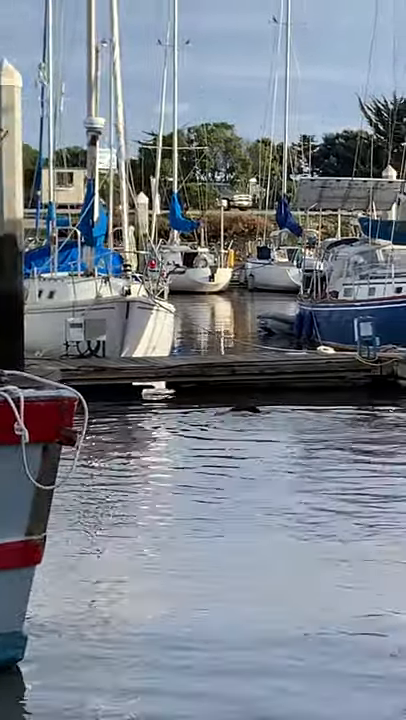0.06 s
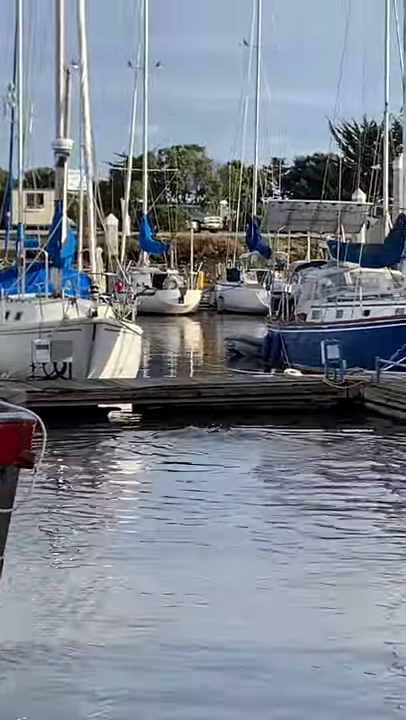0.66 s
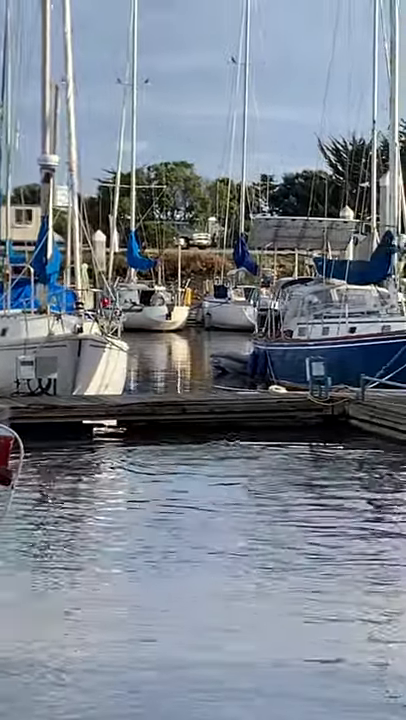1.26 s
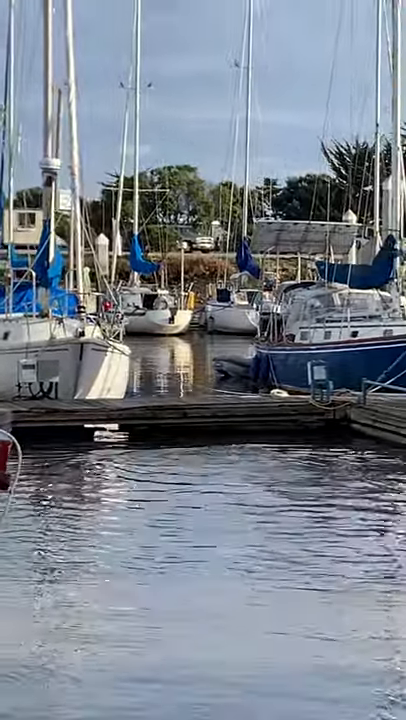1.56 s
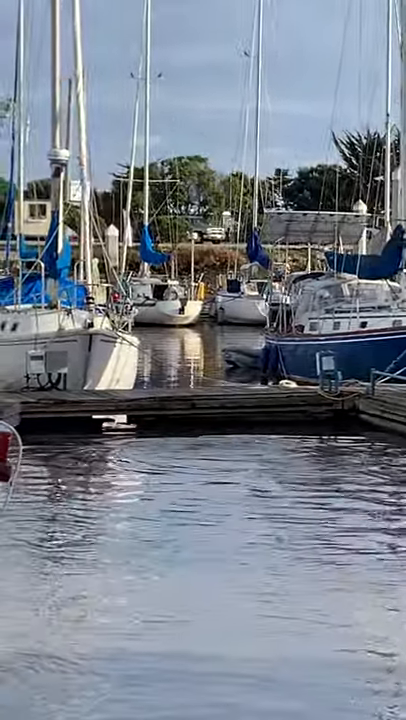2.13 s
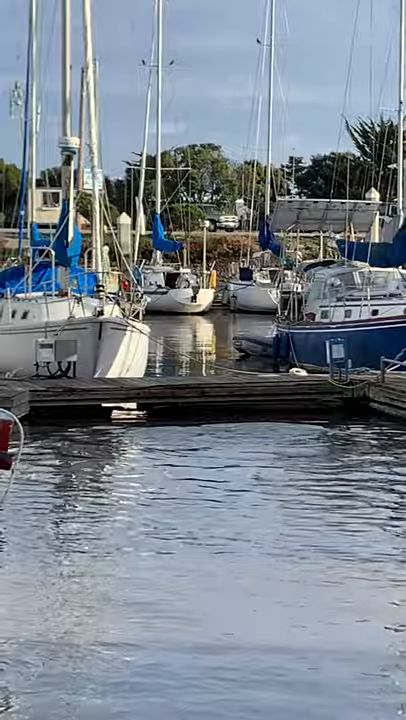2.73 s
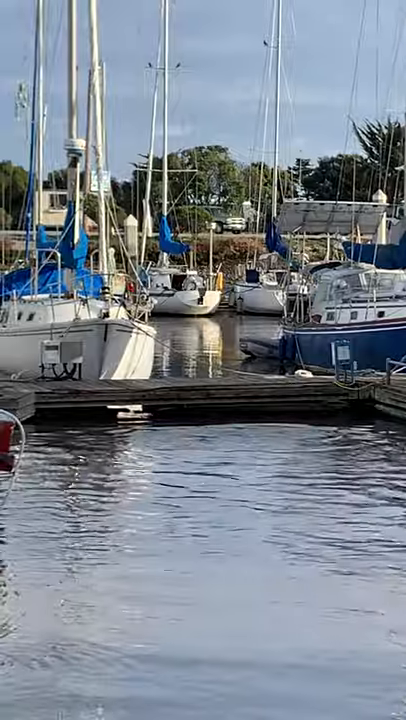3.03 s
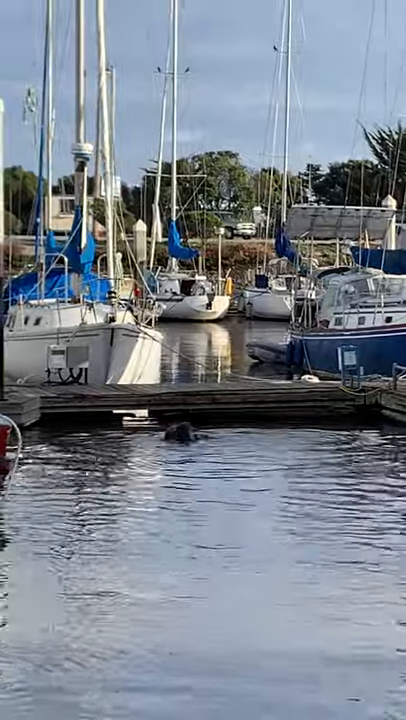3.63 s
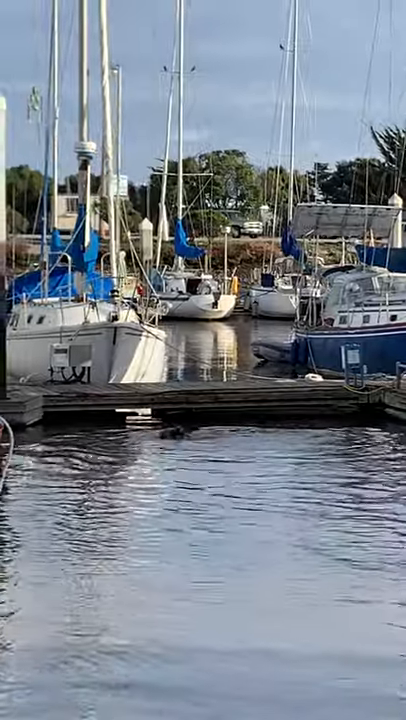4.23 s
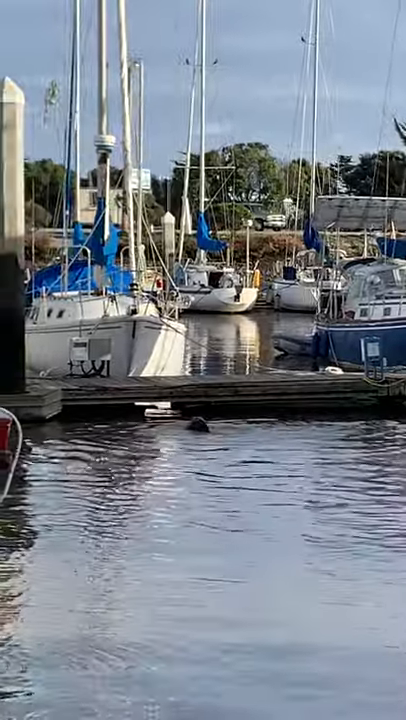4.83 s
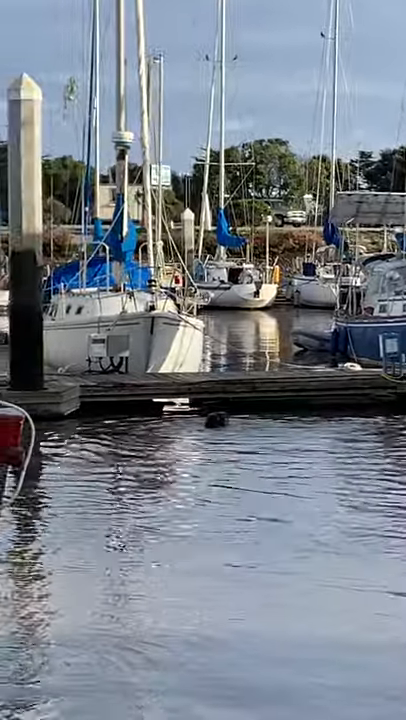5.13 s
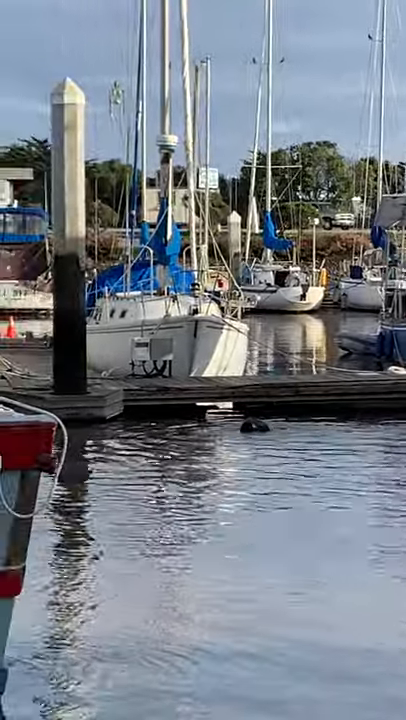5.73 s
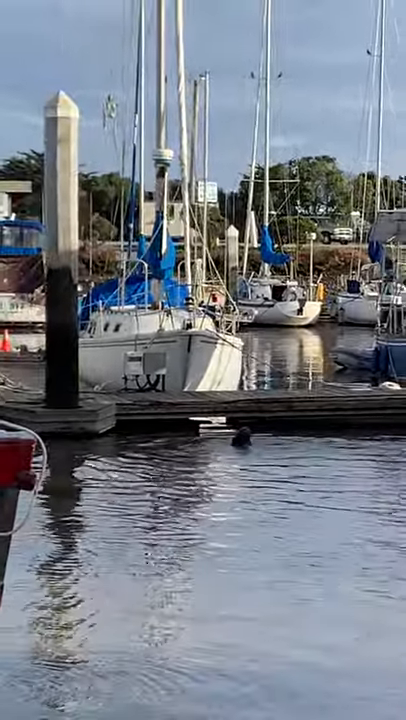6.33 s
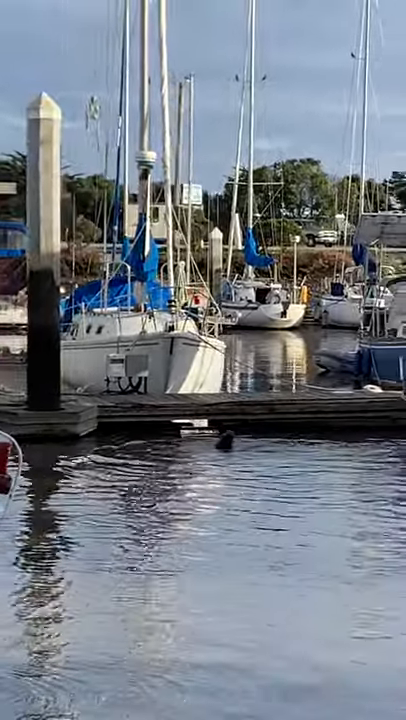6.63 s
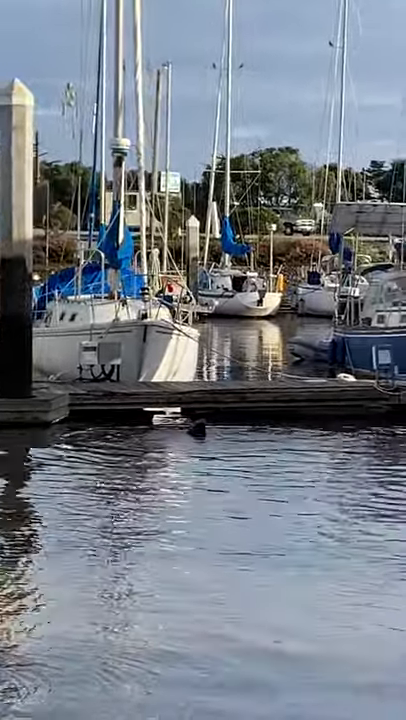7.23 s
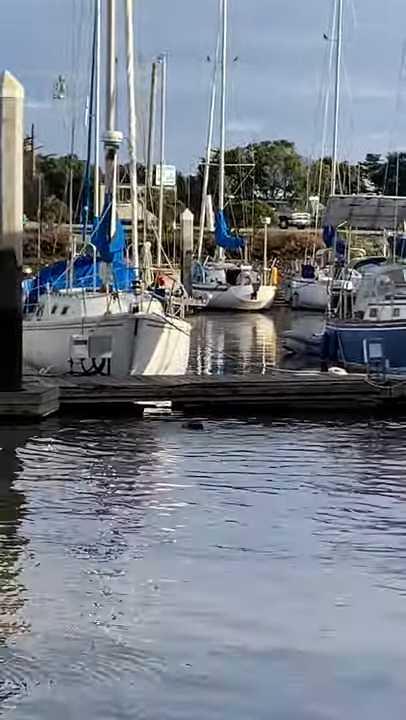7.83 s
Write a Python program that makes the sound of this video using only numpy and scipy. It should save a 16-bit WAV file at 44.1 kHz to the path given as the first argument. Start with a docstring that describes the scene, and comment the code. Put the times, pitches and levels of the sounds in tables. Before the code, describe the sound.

Diesel engines throb and rumble across a calm harbor, revving up once midway and falling back over a steady generator drone.

```python
"""Diesel exhausts throb far across a calm harbour, four firing notes beating against each other.
Midway twin engines rev up and fall back, lifting the rumble and adding growl and combustion knock.
A governed generator drones and clatters on. The scene opens with a buzzing rush; behind it all lie
hums, whirrs, faint whistles and a steady distant wash, heard through two close microphone ports."""
import sys
import numpy as np
from scipy import signal
from scipy.fft import irfft, next_fast_len
from scipy.io import wavfile
from scipy.ndimage import uniform_filter1d

SR = 44100
rng = np.random.default_rng(int(sys.argv[2]) if len(sys.argv) > 2 else 0)


def to_wav(s):
    """Save 16-bit WAV."""
    ch = np.atleast_2d(s).T  # columns
    pcm = np.round(np.clip(ch, -1, 1) * 32767)  # PCM
    wavfile.write(sys.argv[1], SR, pcm.astype(np.int16))


N = 355887
T = np.arange(N) / SR
SHAFT_HZ = 30.45  # generator turns per second


def from_db(db):
    """Decibels to gain."""
    return 10 ** (np.asarray(db) / 20)


def unit(x):
    """Scales to an rms of one."""
    return x / np.sqrt(np.mean(abs(x) ** 2) + 1e-20)


def ease(start_s, takes_s):
    """A smooth ramp from 0 to 1, as of a heavy flywheel."""
    return 1 - np.exp(-(np.maximum(T - start_s, 0) / takes_s) ** 2)


def bump(middle_s, half_s):
    """A bell-shaped envelope that peaks at 1."""
    return np.exp(-((T - middle_s) / half_s) ** 2)


def drift(rate_hz):
    """A smooth complex random modulator of unit size, changing about rate_hz times a second."""
    control_rate = 256
    hz = np.fft.fftfreq(4096, 1 / control_rate)
    a, b = rng.standard_normal((2, len(hz)))
    slow = unit(np.fft.ifft((a + 1j * b) * np.exp(-(hz / rate_hz) ** 2)))
    return np.interp(T * control_rate, np.arange(len(hz)), slow)


def colour(spectrum, hz):
    """Gain of an EQ curve at these frequencies."""
    f, db = np.transpose(spectrum)
    return from_db(np.interp(np.log(hz + 1), np.log(f), db))


# Stereo image at the two ports: f/Hz, coherence/0-1, left lead/rad, left minus right/dB
STEREO_IMAGE = [(60, 1, 0, .7), (180, .99, 0, .9), (350, .92, -.1, .8), (600, .66, -.2, 1),
                (950, .48, .4, 1.4), (1600, .6, 1.2, 1.8), (2500, .4, 1.6, .7), (3500, .7, 1.6, .8),
                (4850, .93, 3.14, .2), (6800, .92, 6.2, 0), (9000, .92, 9.4, 0), (15200, .88, 18.8, 0)]


def ports(hz):
    """Coherence, phase lead and balance of the two ports at these frequencies."""
    f, *columns = np.transpose(STEREO_IMAGE)
    return [np.interp(hz, f, column) for column in columns]


def place(tone, hz):
    """A complex tone as it reaches the two ports, a unit tone giving an rms near one."""
    _, lead, tilt_db = ports(hz)
    left = tone.real * from_db(tilt_db / 2)
    right = (tone * np.exp(-1j * lead)).real * from_db(-tilt_db / 2)
    return np.sqrt(2) * np.array([left, right])


def port_pair(hz, count):
    """Partly coherent random spectra, left and right, shaped (2, frequencies, count)."""
    a, b, c, d = rng.standard_normal((count, len(hz), 4)).T
    coherence, lead, tilt_db = ports(hz[:, None])
    left = a + 1j * b
    right = (coherence * left + np.sqrt(1 - coherence ** 2) * (c + 1j * d)) * np.exp(-1j * lead)
    return np.array([left * from_db(tilt_db / 2), right * from_db(-tilt_db / 2)])


def far_noise(spectrum, patchy_db=2):
    """Coloured stereo noise of unit rms; moving air fades narrow patches of it in and out."""
    hz, frames = np.fft.rfftfreq(4096, 1 / SR), N // 1024 + 5
    patches = rng.standard_normal((frames, len(hz))).T
    patches = unit(uniform_filter1d(uniform_filter1d(patches, size=5, axis=0), size=7, axis=1))
    spectra = port_pair(hz, frames) * colour(spectrum, hz)[:, None] * from_db(patchy_db * patches)
    return unit(signal.istft(spectra, nperseg=4096, noverlap=3072)[1][:, :N])


def resonance(hz, width_hz):
    """A narrow band of noise that follows the pitch curve hz."""
    offset = np.fft.fftfreq(next_fast_len(N), 1 / SR)
    a, b = rng.standard_normal((2, len(offset)))
    blur = unit(np.fft.ifft((a + 1j * b) * np.exp(-(offset / width_hz) ** 2))[:N])
    return place(blur * np.exp(2j * np.pi * np.cumsum(hz) / SR), np.median(hz))


def buzz(hz, spectrum, stop=22, fade_hz=10):
    """The overtones of a hard-working exhaust, each fading on its own."""
    angle = 2 * np.pi * np.cumsum(hz) / SR
    out = np.zeros((2, N))
    for k in range(2, stop):
        top_hz = k * hz.max()
        out += place(colour(spectrum, top_hz) * drift(fade_hz) * np.exp(1j * k * angle), top_hz)
    return unit(out)


# EQ of the harbour bed: f/Hz, relative level/dB
WASH_EQ = [(20, -43), (34, -32), (45, -2.5), (70, -7), (160, -2), (215, -5), (300, -8), (340, -9.5),
           (420, -12), (860, -16.5), (1050, -19.5), (1700, -15.5), (1900, -20.5), (2200, -24.5),
           (4000, -31.5), (7500, -45), (9000, -49), (12000, -50.5), (16000, -55.5)]


def wash(level_db=-27):
    """The even roar of far machinery and roads."""
    return from_db(level_db) * far_noise(WASH_EQ)


# Airy falling whistles: middle t/s, half length/s, middle f/Hz, level/dB
AIR_WHISTLES = [(.5, .22, 7800, -62), (3.2, 0.54, 6700, -64)]


def whistles(width_hz=750, fall_per_s=0.17):
    """Faint airy whistles sink in pitch, like turbochargers running down."""
    out = np.zeros((2, N))
    for middle_s, half_s, hz, db in AIR_WHISTLES:
        pitch = hz * np.exp(-fall_per_s * np.clip(T - middle_s, -2 * half_s, 2 * half_s))
        out += from_db(db) * bump(middle_s, half_s) * resonance(pitch, width_hz)
    return out


def gear_whine(hz=1944, level_db=-49, width_hz=8):
    """A thin, wavering whine of gears."""
    return place(from_db(level_db) * drift(width_hz) * np.exp(2j * np.pi * hz * T), hz)


# Whirring housings: f/Hz, width/Hz, level/dB
HOUSING_BANDS = [(847, 22, -49), (1554, 62, -50), (1705, 77, -47)]


def whirrs(waver=0.028, waver_hz=1.6, flicker_db=2):
    """Machine housings whirr, wavering in pitch and level."""
    out = np.zeros((2, N))
    for hz, width_hz, db in HOUSING_BANDS:
        gain = from_db(db + flicker_db * drift(waver_hz).real)
        pitch = hz * (1 + waver * drift(waver_hz).real)
        out += gain * resonance(pitch, width_hz)
    return out


# Ringing accents: middle t/s, half length/s, middle f/Hz, glide/(Hz/s), width/Hz, level/dB
RING_CUES = [(0.146, 0.17, 382.6, -9, 30, -32.5), (.17, 0.07, 520, 3, 54, -31.5),
             (0.127, 0.13, 1390, 2, 60, -34.5), (.68, 0.1, 152.7, -15, 2, -27),
             (.8, 0.12, 1570, 3, 14, -41), (1.952, 0.12, 1487, -59, 15, -39.5),
             (2.83, 0.12, 179.8, -21, 5.2, -28), (3.393, .35, 1690, 112.5, 16, -51),
             (3.45, .25, 718, 0.5, 20, -47), (3.6, .35, 1357, 0.5, 19, -44.5),
             (3.75, 0.23, 1143, 1, 13, -44), (4.45, 0.16, 1740, -0.5, 28, -43),
             (4.704, .3, 1338, -54, 24, -43.5), (4.9, 0.19, 1625, 1, 30, -44)]


def rings():
    """Now and then a low boom or narrow ringing tone swells and fades."""
    out = np.zeros((2, N))
    for middle_s, half_s, hz, glide, width_hz, db in RING_CUES:
        pitch = hz + glide * np.clip(T - middle_s, -half_s, half_s)
        out += from_db(db) * bump(middle_s, half_s) * resonance(pitch, width_hz)
    return out


# Unsteady hums: f/Hz, width/Hz, level at full load/dB, share of the load swing/0-1
LOW_HUMS = [(43, 0.68, -43, 0.3), (64, 1.4, -34, 0.6), (84.3, 0.83, -42.5, 0), (93.2, 2.3, -38.5, 0.3),
            (107.9, 3.4, -35.5, 0.66), (142.6, 1.5, -37, 0.03), (182, 0.83, -41, 0.03),
            (252.8, 4.9, -40, 0.24), (312.4, 5.3, -42, 0.65)]


def hums():
    """Low wavering hums around the exhaust notes and their overtones; most swell with the load."""
    swing_db = load_db()
    swing_db -= swing_db.max()
    return sum(place(from_db(db + share * swing_db) * drift(width) * np.exp(2j * np.pi * hz * T), hz)
               for hz, width, db, share in LOW_HUMS)


# EQ of the opening rush: f/Hz, relative level/dB
RUSH_EQ = [(40, -25), (90, 12), (150, 6), (280, 2.5), (480, -1), (600, -8), (740, -5), (1150, -7.5),
           (1450, -6), (2300, -14), (4000, -23), (7000, -32), (10000, -43), (16000, -39)]


def rush(burst_db=-32, tail_db=-22.5, tail_t60_s=3.5):
    """The upper engine starts under strain: a broad, buzzing rush swells and dies away."""
    roar = from_db(-3) * far_noise(RUSH_EQ)
    rasp = from_db(-5.5) * buzz(upper_engine()[0], RUSH_EQ)
    burst = from_db(burst_db) * bump(middle_s=0.17, half_s=0.14)
    tail = from_db(tail_db - 60 * T / tail_t60_s)
    return (burst + tail) * (roar + rasp)


# EQ of the trailing hiss: f/Hz, relative level/dB
HISS_EQ = [(1500, -19), (3500, -19), (6000, 2), (7500, -6), (10000, 1), (12000, -17), (16000, -19)]


def hiss(start_db=-51, t60_s=6):
    """A thin hiss fades more slowly than the rush."""
    return from_db(start_db - 60 * T / t60_s) * far_noise(HISS_EQ)


def shaft(wander=0.001646):
    """Turns made by the generator shaft, its speed held nearly even by a governor."""
    return np.cumsum(SHAFT_HZ * (1 + wander * drift(1.65).real)) / SR


# EQ of the generator's rattle: f/Hz, relative level/dB
CLATTER_EQ = [(200, -19), (300, 1.5), (500, -8.5), (850, -6), (1100, -5.5), (1700, -9), (2000, -5),
              (2700, -21), (4000, -23), (7000, -27.5)]


def clatter(turns, level_db=-38, fade_hz=6, fading=1.02):
    """Valves and injectors repeat one rattle every two turns, heard directly and by a fading echo."""
    hz = np.arange(4097) * SHAFT_HZ / 2
    gain = colour(CLATTER_EQ, hz) * (hz > CLATTER_EQ[0][0]) * (hz < CLATTER_EQ[-1][0])
    cycles = irfft(port_pair(hz, count=2) * gain[:, None], axis=1)  # one loop per port and path
    position = np.arange(cycles.shape[1]) / cycles.shape[1]
    blend = fading * drift(fade_hz).real
    crossfade = np.array([np.cos(blend), np.sin(blend)])
    loops = [[np.interp(turns / 2, position, cycle, period=1) for cycle in port.T] for port in cycles]
    return from_db(level_db) * unit((np.array(loops) * crossfade).sum(axis=1))


# Generator partials: multiple of the shaft speed, level/dB
SHAFT_ORDERS = [(3, -41), (3.5, -45), (4, -39), (6, -34.5), (8, -48.5), (9, -42.5), (12, -43.5), (13, -60),
                (16, -53.5), (17, -58), (18, -52), (19, -54), (21, -53.5), (23, -61), (24, -54.5),
                (60, -63), (66, -74)]


def generator(turns, fading=0.65, fade_hz=4):
    """A four-stroke drones in whole and half orders; each fades by itself across the water."""
    out = np.zeros((2, N))
    for multiple, db in SHAFT_ORDERS:
        path = unit(np.exp(2j * np.pi * rng.random()) + fading * drift(fade_hz))
        out += place(from_db(db) * path * np.exp(2j * np.pi * multiple * turns), multiple * SHAFT_HZ)
    return out


def load_db(base_db=-33.5, throttle_db=3.5, pull_db=2, drop_db=13):
    """Rumble level: up with the fast twin's throttle and acceleration, down as the load comes off."""
    speeding_up = np.maximum(np.gradient(throttle(1)), 0)
    lift_db = throttle_db * throttle(1) + pull_db * speeding_up / speeding_up.max()
    return base_db + lift_db - drop_db * ease(start_s=5.1, takes_s=0.47)


# EQ of an engine under load: f/Hz, relative level/dB
RUMBLE_EQ = [(25, -35), (35, -27), (48, 3), (80, 4), (130, -7.5), (300, -6.5), (350, -22), (450, -20.5),
             (800, -21), (1700, -29.5), (4000, -53)]


def rumble():
    """Low noise swells while the engines take load."""
    return from_db(load_db()) * far_noise(RUMBLE_EQ)


# EQ of the combustion knock: f/Hz, relative level/dB
KNOCK_EQ = [(300, -10), (700, -0.5), (950, -10), (1200, 4), (1700, 0.5), (2200, -6.5), (3000, -16.5),
            (4200, -14), (7000, -29), (16000, -47)]


def knock(level_db=-37):
    """Hard combustion knock, blurred to noise by distance, comes and goes with the fuel."""
    fuel = ease(start_s=2.71, takes_s=0.1) * (1 - ease(start_s=4.93, takes_s=0.19))
    return from_db(level_db) * fuel * far_noise(KNOCK_EQ, patchy_db=4.5)


# EQ of the twins' growl: f/Hz, relative level/dB
GROWL_EQ = [(100, -27), (130, 6), (165, -3.5), (260, -3.5), (330, -9), (450, -21)]


def growl(level_db=-34):
    """With the throttles open, the twins' shaft orders stand out and rub against each other."""
    voices = [throttle(twin) * buzz(twin_engine(twin)[0] / 2, GROWL_EQ, stop=10, fade_hz=6.1)
              for twin in (0, 1)]
    return from_db(level_db) * sum(voices)


# Level rides on the exhaust notes: engine, middle t/s, half length/s, level change/dB
LEVEL_RIDES = [("slow twin", .1, 0.092, -5), ("steady", 0.36, 0.19, -19), ("upper", 0.3, 0.37, 2.9),
               ("slow twin", 0.4, .13, 3.5), ("fast twin", 3.1, 0.37, 6.3), ("slow twin", 3.4, 0.39, 3.3),
               ("steady", 3.58, 0.24, 4.3), ("steady", 4.39, 0.35, -5.5), ("fast twin", 4.89, 0.14, 8.4),
               ("slow twin", 5.7, .13, 2.5), ("slow twin", 5.4, 0.26, -9), ("slow twin", 6.56, 0.85, 3.8),
               ("steady", 7.86, 0.058, 3), ("slow twin", 7.8, 0.4, -6)]


def swells(engine):
    """The passing swells and dips of one exhaust note, in dB."""
    return sum(db * bump(s, half_s) for name, s, half_s, db in LEVEL_RIDES if name == engine)


def upper_engine(running_hz=89.13, sag_hz=3.4, recover_s=0.5, base_db=-27, drop_db=11):
    """Firing rate and level of an engine that recovers from a sag, then sheds load as the twins rev."""
    hz = running_hz - sag_hz * np.exp(-T / recover_s)
    return hz, base_db - drop_db * ease(start_s=2.64, takes_s=0.25) + swells("upper")


def steady_engine(running_hz=71.97, over_hz=12, peak_s=0.26, base_db=-23, throb_s=5.68, throb_hz=1.27):
    """Firing rate and level of an engine that overshoots and settles; late on, its note throbs."""
    overshoot = T / peak_s * np.exp(1 - T / peak_s)
    depth = 0.38 * ease(throb_s, takes_s=0.35)
    throb = 1 + depth * np.cos(2 * np.pi * throb_hz * (T - throb_s))
    return running_hz + over_hz * overshoot, base_db + swells("steady") + 20 * np.log10(throb)


# Twin revs, slow then fast: idle f/Hz, full f/Hz, open t/s, spin-up/s, shut t/s, spin-down/s
TWIN_REVS = [(59.2, 85.8, 2.47, .465, 4.87, .4), (61.2, 100.3, 2.44, .63, 4.44, .63)]


def throttle(twin):
    """Speed of the slow twin (0) or the fast twin (1), from 0 at idle to 1 at full."""
    open_s, spin_up_s, shut_s, spin_down_s = TWIN_REVS[twin][2:]
    return ease(open_s, spin_up_s) * (1 - ease(shut_s, spin_down_s))


# Boom of each twin's exhaust pipe: firing f/Hz, level/dB
PIPE_BOOM = [(59, -26), (65, -23), (73, -29.5), (82, -23), (86, -28), (94, -28), (100, -30.5)]


def twin_engine(twin, pull_db_per_hz_per_s=0.03, fast_idle_db=-14):
    """Firing rate and level of a twin that revs once, booming through its pipe's resonances."""
    idle_hz, full_hz = TWIN_REVS[twin][:2]
    hz = idle_hz + (full_hz - idle_hz) * throttle(twin)
    pipe_db = np.interp(hz, *np.transpose(PIPE_BOOM))
    pull_db = pull_db_per_hz_per_s * np.gradient(hz) * SR  # louder speeding up, softer coasting
    idle_db = twin * fast_idle_db * (1 - throttle(twin)) ** 3  # the fast twin idles more quietly
    return hz, pipe_db + pull_db + idle_db + swells(("slow twin", "fast twin")[twin])


def exhaust(hz, db, second_db, third_db, rough, in_step_s=2.83):
    """A muffled exhaust: a strong, slightly uneven firing note with faint, fading overtones."""
    cycles = np.cumsum(hz) / SR
    # As the twins overtake the steady engine, all exhausts fire in step and boom together.
    firing = np.exp(2j * np.pi * (cycles - np.interp(in_step_s, T, cycles)))
    note = firing * (1 + rough * drift(20))
    second = from_db(second_db) * firing ** 2 * drift(1.2)
    third = from_db(third_db) * firing ** 3 * drift(5)
    return place(from_db(db) * (note + second + third), np.median(hz))


def scene():
    """Four exhaust notes beat together over the generator and the harbour bed."""
    exhausts = exhaust(*steady_engine(), second_db=-17.5, third_db=-34, rough=0.022)
    for twin in (0, 1):
        exhausts += exhaust(*twin_engine(twin), second_db=-21.5, third_db=-24.5, rough=0.017)
    exhausts += exhaust(*upper_engine(), second_db=-14, third_db=-23.5, rough=0.018)
    turns = shaft()
    engines = exhausts + growl() + generator(turns) + clatter(turns)
    bed = hums() + whirrs() + rings() + gear_whine() + whistles() + wash()
    strain = rumble() + knock() + rush() + hiss()
    return engines + bed + strain


def record(dry):
    """Soft ends and a steep high cut at 15.8 kHz."""
    eased = dry * signal.windows.tukey(N, 0.001)
    high_cut = signal.firwin(511, 15800, window=("kaiser", 9), fs=SR)
    return signal.oaconvolve(eased, high_cut[None], "same")


dry = scene()
out = record(dry)
to_wav(out)
```